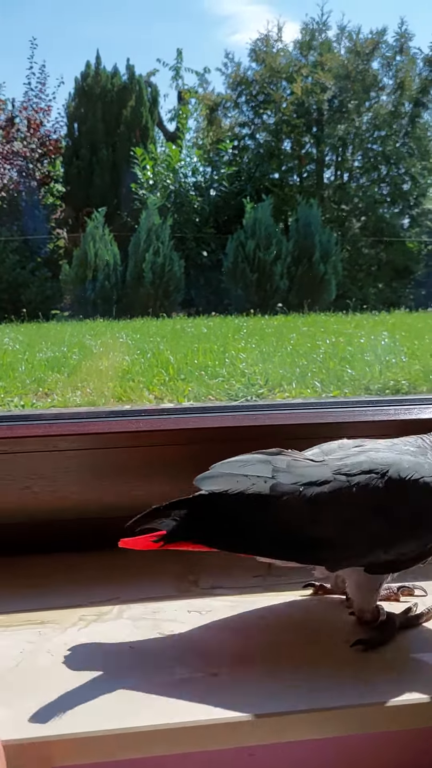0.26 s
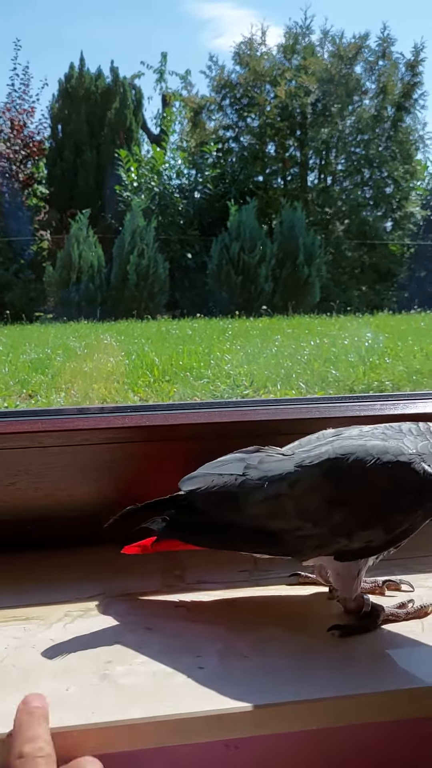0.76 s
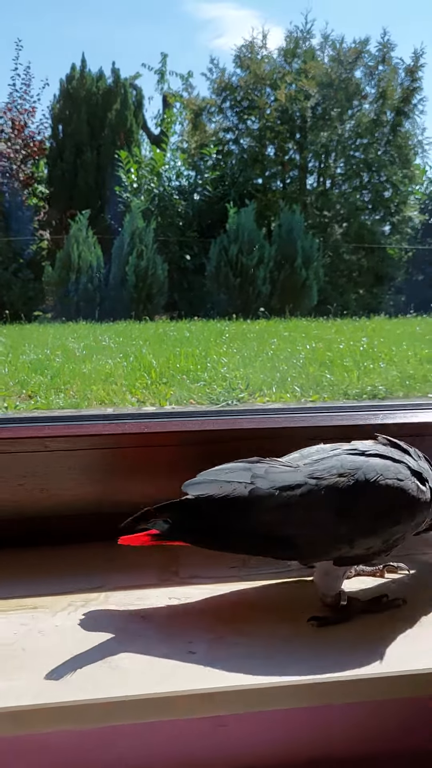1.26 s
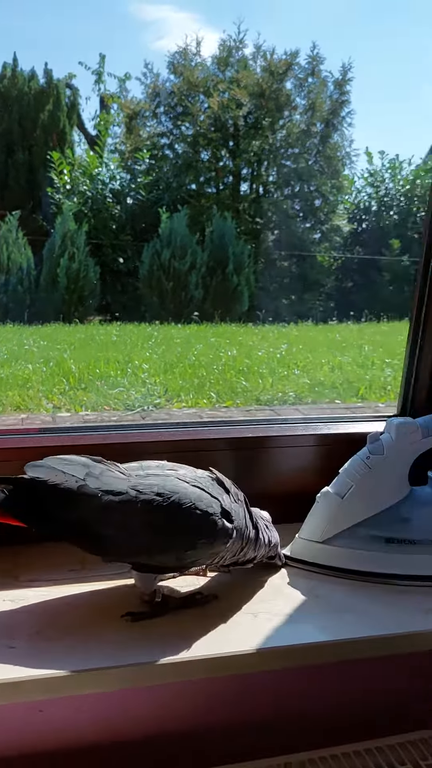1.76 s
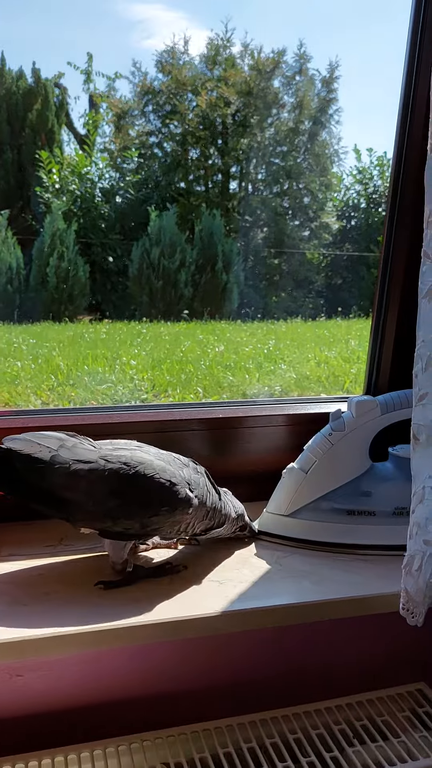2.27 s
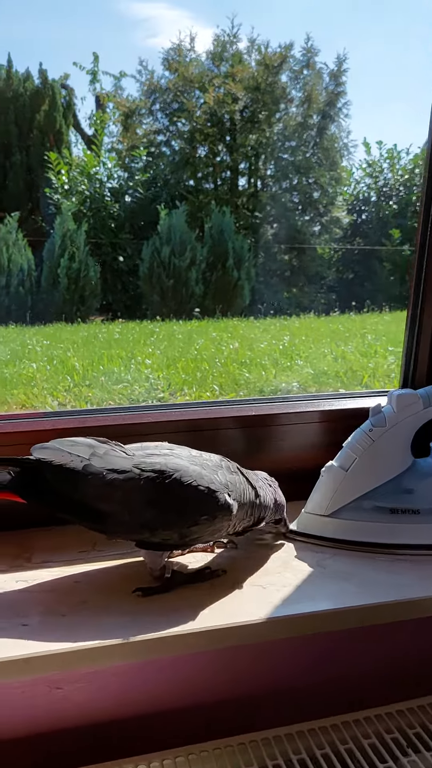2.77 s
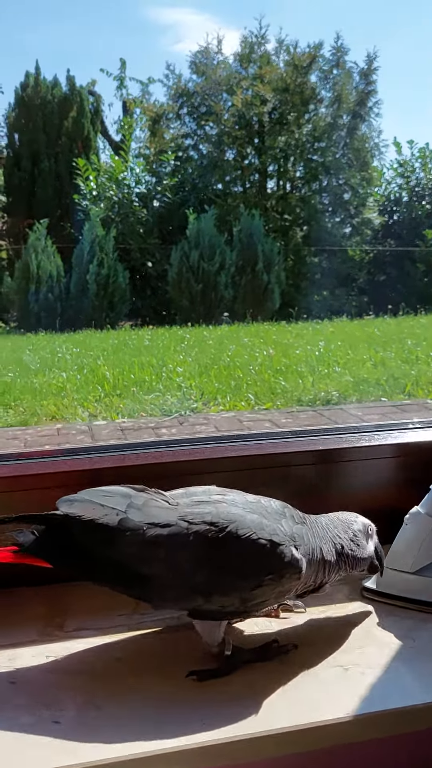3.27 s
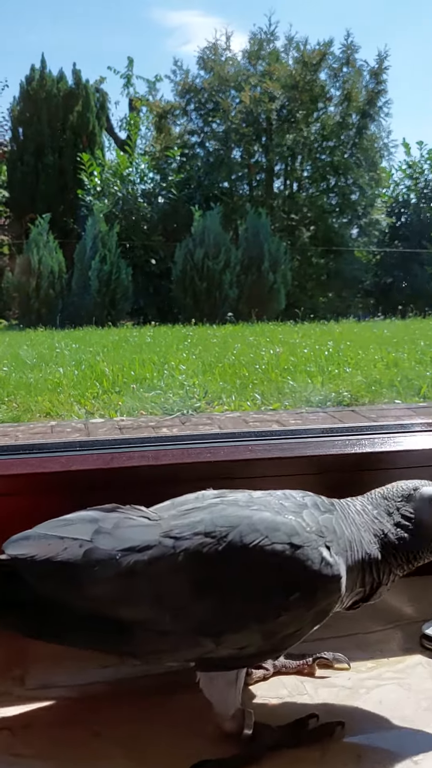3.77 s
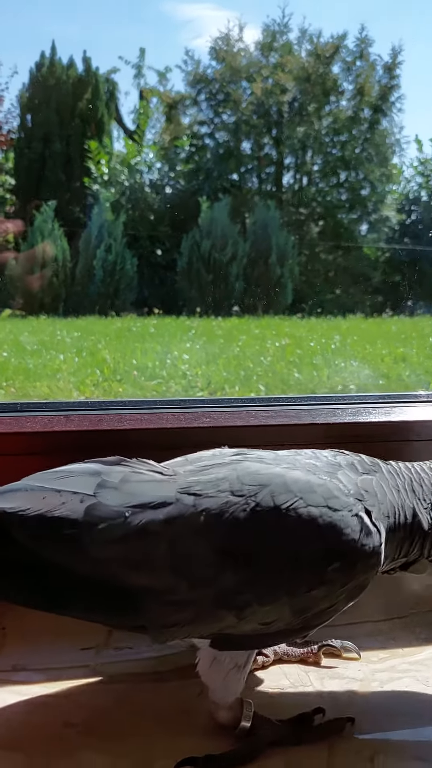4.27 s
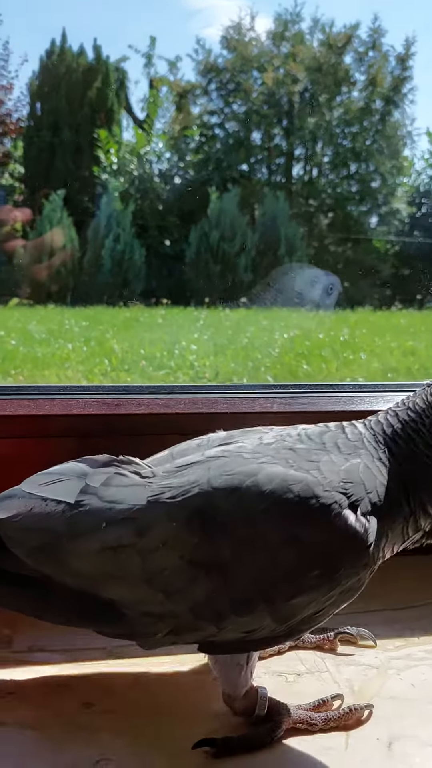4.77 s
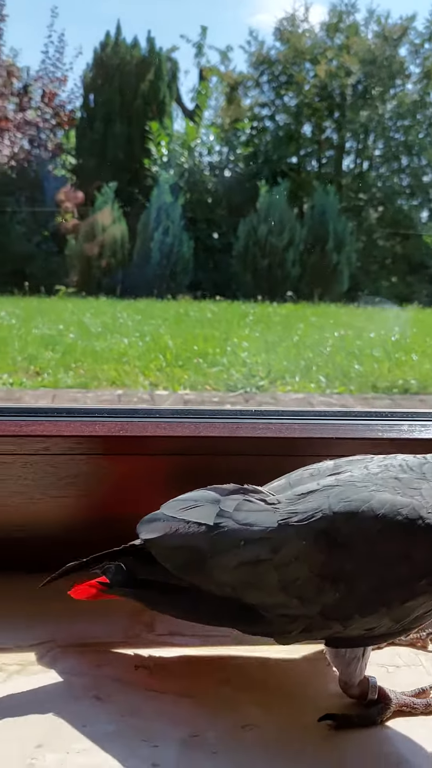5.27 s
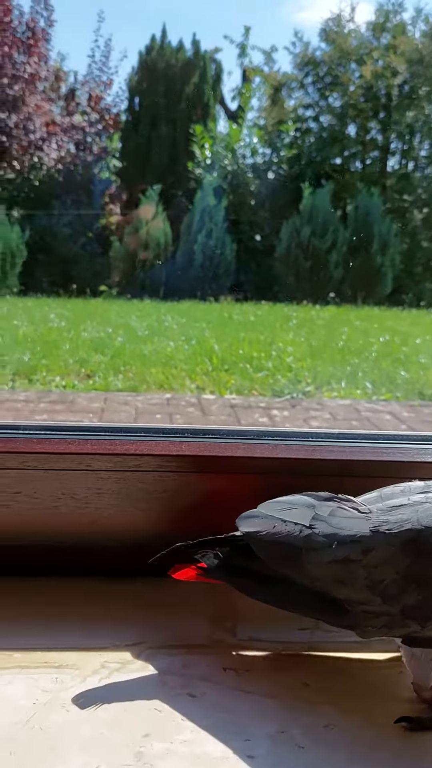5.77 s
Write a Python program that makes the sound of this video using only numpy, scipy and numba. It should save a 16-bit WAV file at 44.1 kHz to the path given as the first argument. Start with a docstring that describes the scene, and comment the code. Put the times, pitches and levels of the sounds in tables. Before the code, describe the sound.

A parrot moves about on a stone sill in a small, lightly echoing room. Four muted paired finger taps lead to a hard beak knock on an iron, with short metallic rattles and gritty drags after it. Feathers or cloth swish, claws tick and scratch increasingly densely, and a single heavy stone knock dominates late. Soft brushing ends it. The microphone is close, with low house rumble and quiet hiss.

```python
"""Parrot on a stone windowsill

Indoors, close to a hand-held phone, fingers and feet thump the sill and the beak knocks and drags a clothes iron.
Blows excite decaying modes; dragging and scrabbling are stick-slip noise through the same modes.
Claw ticks and feather and cloth rustles are shaped noise; a faint whistle and short high tones are sines.
A small room adds dense, decaying echoes over a low house rumble and a steady hiss.
"""
import sys
import numpy as np
from scipy import signal
from scipy.fft import rfft, irfft
from scipy.io import wavfile
from scipy.ndimage import uniform_filter1d
from numba import njit

SR = 44100
rng = np.random.default_rng(int(sys.argv[2]) if len(sys.argv) > 2 else 0)


def generate_wav(sig):
    """Save sig (samples, or channels by samples) to the path in sys.argv[1] as 16-bit PCM at SR."""
    pcm = np.round(np.clip(np.atleast_2d(sig).T, -1, 1) * 32767).astype(np.int16)
    wavfile.write(sys.argv[1], SR, pcm)


N = 265482  # samples

# modes of the stone slab, before each blow's weighting and damping: mode_hz, relative_db, t60_s
SILL_MODES = [(132, -19, .55), (200, -11, .15), (225, -5, .06), (235, -13, .4), (258, -14, .42),
              (301, -10, .38), (345, -9, .25), (407, -9, .27), (458, -8, .27), (528, -11, .2),
              (620, -14, .15), (720, -14, .17), (960, -13, .15), (1070, -10, .2)]
# modes of the clothes iron, before each blow's weighting and damping: mode_hz, relative_db, t60_s
IRON_MODES = [(408, -0.5, 0.087), (528.6, -3, 0.15), (569, -5, 0.13), (601, -32, 0.5), (906, -2, 0.067),
              (1133, 0, 0.045), (1410, -6.5, 0.086), (1954, 2, 0.1), (2140, 1, 0.05), (2280, -34, .03)]
# treble spectrum of the dragged iron and the rustles: frequency_hz, relative_db
TREBLE_SPECTRUM = [(3000, -28), (5000, -3.5), (7000, 1.5), (9000, -2.5), (11500, -0.5), (14000, -5),
                   (16000, -2.5)]

ALIKE_HZ = 670  # the two ports hear nearly the same below this
PORT_LAG_S = 0.00015  # later arrival at the right port
CRACK_PAN_DB = -4.5  # left minus right: the phone's body shades the left port from bright sounds
CRACK_RISE_S = 0.0015
SPOT_DB, SPOT_OCTAVES = 12.5, 0.21  # the struck spot lifts the modes near its favoured one


def undb(db):
    """Level law: decibels to an amplitude ratio."""
    return 10 ** (np.asarray(db) / 20)


def unit(x):
    """Power normalisation: scales to rms 1."""
    return x / np.sqrt(np.mean(x ** 2))


def fade(t, t60):
    """Exponential decay: 60 dB down after t60 seconds."""
    return np.exp(-np.log(1000) * t / t60)


def band(x, hz, width):
    """Resonance: a band-pass of the given centre and width in Hz."""
    centre = min(hz, .45 * SR)
    sharpness = hz / min(width, .4 * SR)
    return signal.lfilter(*signal.iirpeak(centre, sharpness, fs=SR), x)


@njit
def sweep(x, hz, width):
    """Moving resonance: a state-variable band-pass whose centre follows hz."""
    y, b, l = np.empty(len(x)), 0., 0.
    for i in range(len(x)):
        g, k = np.tan(np.pi * hz[i] / SR), width / hz[i]
        v = (b + g * (x[i] - l)) / (1 + g * (g + k))
        b, l, y[i] = 2 * v - b, l + 2 * g * v, k * v
    return y


def colour(x, points):
    """Spectral weighting: filters x by (Hz, dB) points joined along log frequency."""
    hz, db = np.transpose(points)
    f = np.maximum(np.arange(x.shape[-1] // 2 + 1) * SR / x.shape[-1], 1)
    gain = undb(np.interp(np.log(f), np.log(hz), db))
    return irfft(rfft(x) * gain, x.shape[-1])


def ports(count):
    """Spatial coherence: noise at two ports, shared in the bass and unrelated in the treble."""
    mid, side = rng.standard_normal((2, count))
    side = signal.lfilter(*signal.butter(1, ALIKE_HZ, "high", fs=SR), side)
    return np.array([mid + side, mid - side]) / np.sqrt(2)


def walk(rate):
    """Slow fluctuation: random levels held 1 / rate s and slewed, spread near 1."""
    k = int(SR / rate)
    return uniform_filter1d(np.repeat(rng.standard_normal(N // k + 1), k), k)[:N]


def glide(s, hz):
    """Linear interpolation: joins values in time."""
    return np.interp(np.arange(N) / SR, s, hz)


def pan(db):
    """Level difference: left and right gains whose ratio is db."""
    return undb(np.array([db, -db]) / 2)


def add(out, s, sound, pan_db, lag_s):
    """Superposition: mixes in a sound at time s, with level and arrival differences between ports."""
    for port, gain in enumerate(pan(pan_db)):
        i = int((s + port * lag_s) * SR)
        out[port, i:i + len(sound)] += gain * sound[:N - i]


def strokes(start, hold, db, rise_s, t60):
    """Envelope: gain over time, one row a stroke, with rise, hold and exponential fall."""
    out = np.zeros((len(start), N))
    rises = np.resize(rise_s, len(start))
    for row, s, hold_s, gain, rise in zip(out, start, hold, undb(db), rises):
        first = max(int(s * SR), 0)
        last = min(int((s + rise + hold_s + t60) * SR), N)
        i = np.arange(first, last)
        t = i / SR - s
        fall = fade(np.maximum(t - rise - hold_s, 0), t60)
        row[i] = gain * np.clip(t / rise, 0, 1) ** 2 * fall
    return out


def ring(modes, contact_ms, scatter_db, blur, rise_s, spot_hz):
    """Modal response: a half-sine push sets modes ringing, weighted by the struck spot; peak 1."""
    hz, db, t60 = np.transpose(modes)[:, :, None]
    t = np.arange(int(t60.max() * SR)) / SR
    lift_db = SPOT_DB * np.exp(-(np.log2(hz / spot_hz) / SPOT_OCTAVES) ** 2)
    spot = undb(db + lift_db + scatter_db * rng.standard_normal(hz.shape))
    # every mode is a close cluster, wider towards the top, so no clean whistle is left
    cluster = 0
    for _ in range(3):
        detune = 1 + blur * hz / 1000 * rng.standard_normal(hz.shape)
        cluster = cluster + np.sin(2 * np.pi * hz * detune * t)
    swing = (1 - np.exp(-t / rise_s)) * np.sum(spot * fade(t, t60) * cluster, 0)
    n = max(int(contact_ms * SR / 1000), 2)
    push = np.sin(np.pi * (np.arange(n) + .5) / n)
    y = np.convolve(swing, push)[:len(t)]
    return y / np.abs(y).max()


def crack(hz, width, t60):
    """Contact noise: a band of noise, rms 1 before its short rise and exponential fall."""
    t, noise = np.arange(SR // 4) / SR, rng.standard_normal(SR // 4)
    narrow = band(noise, hz, width)
    steep = band(band(narrow, hz, 2 * width), hz, 2 * width)
    return unit(steep) * fade(t, t60) * np.minimum(t / CRACK_RISE_S, 1)


def strikes(events, modes, scatter_db, blur, rise_s, crack_hz, crack_t60, lag_s):
    """Impact and damping: blows ring a body and crack; what stays on the body shortens its decay."""
    out = np.zeros((2, N))
    for s, body_db, crack_db, contact_ms, spot_hz, free, pan_db in events:
        damped = np.array(modes) * [1, 1, free]
        body = ring(damped, contact_ms, scatter_db, blur, rise_s, spot_hz)
        contact = crack(crack_hz, 2730, free * crack_t60)
        add(out, s - rise_s, undb(body_db) * body, pan_db, lag_s)
        add(out, s - rise_s, undb(crack_db) * contact, pan_db + CRACK_PAN_DB, lag_s)
    return out


def grit(rate, spread_db):
    """Stick-slip: dense random slips of very uneven size modulate noise at both ports."""
    size = undb(spread_db * np.minimum(rng.exponential(size=N), 4))
    slips = (rng.random(N) < rate / SR) * size
    puffs = signal.lfilter([1], [1, -fade(1 / SR, 0.045)], slips)  # each slip falls 60 dB in 45 ms
    return unit(ports(N) * puffs)


def friction(table, rise_s, fall_t60, modes, top, rate, blur):
    """Friction-driven resonance: stick-slip shakes a body while grit scratches above it."""
    s, hold, *levels_db, pan_db = np.transpose(table)
    body, gritty, treble = (pan(pan_db) @ strokes(s, hold, db, rise_s, t60)
                            for db, t60 in zip(levels_db, fall_t60))
    slips = grit(rate, 2.1)
    # rubbing widens each mode by the share blur of its frequency
    rings = [(hz, undb(db) * unit(band(slips, hz, 0.67 / t60 + blur * hz))) for hz, db, t60 in modes]
    low = unit(sum(y for hz, y in rings if 200 < hz < 800))
    high = sum(y for hz, y in rings if hz > 800)
    hash_noise = unit(band(band(slips, 2200, 2600), 2200, 5000))
    scratch = unit(3.0 * high + hash_noise)
    return body * low + gritty * scratch + treble * unit(colour(slips, top))


def thumps():
    """Impact on a slab: blows excite the stone's modes, some cut short by damping."""
    # thumps: time_s, thump_db, crack_db, contact_ms, favoured_mode_hz, free_ring_share, left_minus_right_db
    thump_rows = [(0.052, -36.5, -47, 0.58, 296, 0.22, -1.5), (0.089, -40.5, -57, 0.66, 142, 0.29, -5),
                  (1.911, -49.5, -74, 0.27, 232, 1, 3), (3.243, -36.5, -45.5, 0.73, 325, 0.4, -2.5),
                  (4.072, -47.5, -45, 0.69, 253, 0.27, 3.5), (4.202, -57.5, -80, 0.56, 590, 0.39, 9),
                  (4.362, -49.5, -52, 0.41, 344, 0.33, 9.5), (4.461, -47, -69, 0.5, 335, 0.29, 7),
                  (4.534, -46.5, -82, 0.63, 345, 0.3, 6.5), (4.895, -15.5, -33.5, 0.54, 242, 0.89, -3)]
    return strikes(thump_rows, SILL_MODES, 1.0, 0.017, 0.003, 1190, 0.21, .00003)


def fingers():
    """Paired impacts: two fingertips land one after the other on the sill's edge."""
    # taps of the first finger: time_s, thump_db, crack_db, left_minus_right_db
    tap_rows = [(0.272, -40, -87, 3), (0.46, -43, -74.5, -5), (0.632, -43, -81, 3.5),
                (0.82, -44, -83.5, -2.5)]
    # modes of the sill's edge, before each tap's weighting: mode_hz, relative_db, t60_s
    edge_modes = [(165, -15, .1), (233, -1, 0.083), (311.6, 2.5, 0.085), (337.5, -2.5, 0.089),
                  (450, -4.5, 0.089), (529, 0.5, 0.074), (623, -12, 0.072), (724, -9.5, 0.044),
                  (883, -13, 0.072)]
    contact_ms, spot_hz = 1, 669
    second_s, second_db = 0.028, -5.5  # delay and relative level of the second finger
    rows = []
    for s, db, crack_db, pan_db in tap_rows:
        for late_s, less_db in ((0, 0), (second_s, second_db)):
            rows.append((s + late_s, db + less_db, crack_db + less_db, contact_ms, spot_hz, 1, pan_db))
    return strikes(rows, edge_modes, 1.0, 0.045, 0.0059, 2000, 0.3, .00005)


def beak_blows():
    """Impact on metal: the beak excites the iron's modes."""
    # blows: time_s, body_db, crack_db, contact_ms, favoured_mode_hz, free_ring_share, left_minus_right_db
    blow_rows = [(1.146, -47.5, -52, 0.15, 546, 1, 0), (1.169, -25.5, -37.5, 0.83, 520, 0.69, -4.5),
                 (1.219, -44, -72, 0.68, 525, 0.32, -3), (1.294, -44, -58, 0.37, 570, 0.55, 3),
                 (1.389, -38, -76, 0.47, 565, 0.5, 2), (1.488, -48.5, -69, 0.53, 565, 1, 3),
                 (1.638, -62, -61, 0.55, 630, 0.88, 11), (2.025, -60, -62, 0.35, 387, 0.72, -6),
                 (2.115, -44.5, -46, 0.12, 510, 1, 5), (2.195, -48.5, -60, 0.85, 430, 0.76, 2),
                 (2.51, -48, -67, 0.25, 530, 1, 2), (2.601, -55, -43, 0.32, 560, 1, 7),
                 (2.74, -56, -74, 0.18, 564, 0.51, 4), (2.762, -52, -70, 0.24, 570, 0.6, 3),
                 (2.79, -57, -63, 0.2, 617, 0.9, 10), (2.949, -45.5, -55, 0.21, 554, 0.74, 0)]
    return strikes(blow_rows, IRON_MODES, 3, 0.022, 0.0025, 2200, 0.038, PORT_LAG_S)


def iron_drags():
    """Stick-slip: the iron, dragged over stone, rings in its own widened modes."""
    # strokes: start_s, hold_s, body_db, grit_db, treble_db, left_minus_right_db
    drag_rows = [(1.178, 0.0078, -42, -61, -82, -0.5), (1.245, 0.013, -58, -43, -76, 1),
                 (1.295, 0.0039, -54, -67, -86, -2), (1.372, 0.029, -56, -58, -102, -1),
                 (1.48, 0.017, -62.5, -73, -75, -2), (1.525, 0.03, -63, -65, -76, 0),
                 (2.118, 0.0043, -50.5, -57.5, -69, -4.5), (2.19, 0.035, -59, -76, -77, -2),
                 (2.236, 0.033, -54.5, -74, -81, -1), (2.28, 0.041, -53.5, -68, -75, -1),
                 (2.345, 0.025, -67.5, -64.5, -82, -3), (2.495, 0.029, -57, -60.5, -75, -1),
                 (2.592, 0.028, -57, -55, -72, 0.5), (2.772, 0.069, -63, -63.5, -75, -2),
                 (2.945, 0.011, -52.5, -89, -80, 2), (3.03, 0.035, -70.5, -67.5, -79, -7)]
    rise_s, t60_s = 0.011, (0.19, 0.13, 0.35)  # falls of body, grit, treble
    return friction(drag_rows, rise_s, t60_s, IRON_MODES, TREBLE_SPECTRUM, 1800, .07)


def claws():
    """Brief contact: claw tips tick on stone as noise bursts; one snap rings a small hard part."""
    # ticks: start_s, level_db, treble_db, centre_hz, t60_s, left_minus_right_db
    tick_rows = [(1.2597, -40, -73, 1970, 0.13, -7), (1.294, -34, -82, 1770, 0.038, -8.5),
                 (1.5282, -58.5, -71, 1870, 0.16, -6), (1.8462, -74, -69, 3960, 0.11, -13),
                 (1.9076, -59, -79, 1620, 0.03, -10), (2.3067, -54.5, -80, 1850, 0.08, -11.5),
                 (2.516, -55, -88, 1780, 0.17, -4), (2.5999, -60.5, -67.5, 2470, 0.15, -27.5),
                 (3.254, -45.5, -77, 2340, 0.02, -26.5), (3.3423, -47.5, -67, 1960, 0.17, -10.5),
                 (3.843, -59, -67, 2300, 0.04, -7), (3.875, -62, -72, 1870, 0.016, -8),
                 (4.02, -60, -68, 2100, 0.035, -1), (4.0478, -46, -53, 1610, 0.035, -7),
                 (4.069, -65, -51, 2550, 0.042, -3), (4.114, -47, -78, 1340, 0.019, -20),
                 (4.2048, -65, -71, 2160, 0.03, -15), (4.272, -45, -55, 2070, 0.0092, -3),
                 (4.334, -58, -50, 2120, 0.027, 0), (4.5189, -45, -60, 2290, 0.023, 2),
                 (4.5306, -48, -68, 2220, 0.025, -15.5), (4.7395, -59.5, -50.5, 1600, 0.087, -11),
                 (4.779, -50, -75.5, 2010, 0.084, -6), (4.815, -44, -57, 2090, 0.013, -7),
                 (5.2077, -64, -72, 1730, 0.023, -27)]
    # one bright snap: start_s, level_db, left_minus_right_db
    snap_rows = [(4.4129, -25.5, -8.5)]
    # modes of the small hard part, before the snap's weighting: mode_hz, relative_db, t60_s
    snap_modes = [(2200, -4, .008), (4170, -8, .012), (6460, -3, .02), (7690, -7, .018), (10400, -5, .012),
                  (12600, 0, .018), (13500, -6, .01)]
    out = np.zeros((2, N))
    for s, db, treble_db, hz, t60, pan_db in tick_rows:
        tick = undb(db) * crack(hz, 1500, t60) + undb(treble_db) * crack(7700, 9900, t60)
        add(out, s, tick, pan_db, PORT_LAG_S)
    for s, db, pan_db in snap_rows:
        add(out, s, undb(db) * ring(snap_modes, .05, 0, 0.0019, 0.00023, 9900), pan_db, PORT_LAG_S)
        add(out, s, undb(db - 8.0) * crack(9160, 9500, 0.039), pan_db, PORT_LAG_S)
    return out


def scrabble():
    """Stick-slip: claws scrabbling over the slab shake its widened modes."""
    # strokes: start_s, hold_s, body_db, grit_db, treble_db, left_minus_right_db
    scrabble_rows = [(4.325, 0.031, -55.5, -52.5, -57, -1), (4.398, 0.0046, -47, -62, -61, 3),
                     (4.42, 0.038, -55.5, -66.5, -54, -3), (4.48, 0.17, -76.5, -75, -63, -2),
                     (4.525, 0.0039, -54.5, -73, -74.5, 3), (4.66, 0.04, -74, -72.5, -59, -2),
                     (4.712, 0.012, -58, -69, -57.5, 1.5), (4.73, 0.022, -63, -66, -57.5, 5),
                     (4.79, 0.18, -69, -66.5, -63, 1.5)]
    # treble spectrum of the claws: frequency_hz, relative_db
    claw_spectrum = [(3000, -24), (5000, -4), (7000, -2.5), (9000, -4.5), (11500, 2), (13500, -3),
                     (16000, -8.5)]
    rise_s, t60_s = 0.012, (0.11, 0.14, 0.067)  # falls of body, grit, treble
    return friction(scrabble_rows, rise_s, t60_s, SILL_MODES, claw_spectrum, 900, .16)


def creak():
    """Stick-slip: fast slips sound through one gliding and one fixed resonance."""
    # short creaks: start_s, hold_s, level_db, resonance_hz
    creak_rows = [(1.908, 0.024, -55.5, 1390), (2.021, 0.003, -59, 1110)]
    rise_s, t60_s = (0.029, 0.0065), 0.079  # one rise per creak
    s, hold, db, hz = np.transpose(creak_rows)
    slips, hz = grit(1900, 1.6), glide(s + 0.021, hz)
    tone = []
    for x in slips:
        moving = sweep(sweep(x, hz, 280.0), hz, 280.0)
        still = band(band(x, 840, 290), 650, 350)
        tone.append(moving + 1.1 * still)
    return strokes(s, hold, db, rise_s, t60_s).sum(0) * unit(np.array(tone))


def rustles():
    """Comb filtering: soft friction of feathers and cloth meets its mirror image in the sill."""
    # swells: start_s, hold_s, level_db, treble_db, resonance_hz, left_minus_right_db
    rustle_rows = [(-0.04, 0.0053, -60, -63, 1740, -4), (0.026, 0.018, -55, -63, 1840, -4.5),
                   (0.205, 0.051, -76, -76.5, 1900, -9), (1.813, 0.011, -70.5, -69, 1930, -3),
                   (1.89, 0.038, -74.5, -77, 1440, -16), (2.926, 0.0094, -65, -76, 1800, -13),
                   (3.04, 0.14, -63, -67, 2100, -6.5), (3.205, 0.066, -56.5, -61, 2050, -3.5),
                   (3.304, 0.024, -55, -55, 1950, -1), (3.442, 0.15, -63, -65, 1930, -3.5),
                   (3.61, 0.074, -74.5, -71.5, 2270, -6), (3.72, 0.16, -79, -75.5, 2500, -8),
                   (4.017, 0.0071, -59, -63.5, 1740, 6), (4.238, 0.014, -68, -74, 1650, -4),
                   (4.937, 0.046, -60, -68.5, 2000, -8), (5.08, 0.11, -66.5, -67.5, 1960, -1.5),
                   (5.204, 0.026, -67, -65.5, 2080, -5), (5.303, 0.15, -63, -66.5, 1880, -4.5),
                   (5.513, 0.06, -55, -54.5, 1850, -2.5), (5.662, 0.037, -59.5, -64.5, 1620, -4.5),
                   (5.854, 0.044, -72, -72.5, 1690, -5)]
    rise_s, t60_s = 0.039, (0.22, 0.2)  # falls of middle and treble
    s, hold, db, treble_db, hz, pan_db = np.transpose(rustle_rows)
    hz = glide(s + rise_s, hz)
    rub = grit(4000, 2.0)
    core = np.array([sweep(sweep(x, hz, 1800.0), hz, 1800.0) for x in rub])
    upper = band(band(rub, 3470, 3300), 3470, 3300)
    middle = unit(unit(core) + .5 * unit(upper))
    level, treble = (pan(pan_db) @ strokes(s, hold, d, rise_s, t60)
                     for d, t60 in zip((db, treble_db), t60_s))
    mix = level * middle + treble * unit(colour(rub, TREBLE_SPECTRUM))
    # the echo lags by one period of the first comb peak, gliding as the phone moves
    late = np.arange(N) - SR / uniform_filter1d(hz, int(.1 * SR))
    echo = np.array([np.interp(late, np.arange(N), x) for x in mix])
    return undb(walk(25)) * (mix + .09 * echo)  # flicker near 1 dB


def whistle():
    """Harmonic series: a thin, wavering, rising whistle of three high partials within the rustle."""
    # partials of the whistle: multiple, relative_db
    partials = [(3, 0), (4, -3), (5, 1)]
    start_s, length_s, level_db = 2.99, 0.21, -79
    from_hz, to_hz = 2040, 2290  # gliding base; the partials are its multiples
    out = np.zeros((2, N))
    along = np.arange(int(length_s * SR)) / SR / length_s
    hz = from_hz + (to_hz - from_hz) * np.sin(np.pi * along / 2) ** 2
    wavering_hz = hz * (1 + .003 * walk(70)[:len(hz)])
    phase = 2 * np.pi * np.cumsum(wavering_hz) / SR
    tone = sum(undb(d) * np.sin(k * phase) for k, d in partials)
    level = undb(level_db + 1.5 * walk(30)[:len(hz)]) * np.sin(np.pi * along)
    add(out, start_s, level * tone, 0, 0)
    return out


def high_tones():
    """Pure tones: very short, faint, steady high sines under half-sine envelopes."""
    # tones: start_s, pitch_hz, level_db, length_s
    tone_rows = [(3.576, 11600, -63, 0.027), (5.71, 5800, -55, 0.0079), (5.916, 6030, -68, 0.018)]
    out = np.zeros((2, N))
    for s, hz, db, length_s in tone_rows:
        t = np.arange(int(length_s * SR)) / SR
        tone = np.sin(np.pi * t / length_s) * np.sin(2 * np.pi * hz * t)
        add(out, s, undb(db) * tone, -2, PORT_LAG_S)
    return out


def room(x):
    """Reverberation: dense echoes, each octave dying at its own pace."""
    # decay of the room: frequency_hz, t60_s
    room_decay = [(100, 0.5), (500, 0.29), (2000, 0.51), (7000, 0.21), (12000, 0.75)]
    room_db, gap_s = -4.5, 0.0035  # the tail is silent for one gap, then rises over another
    t = np.arange(int(.6 * SR)) / SR
    hz, t60 = np.transpose(room_decay)
    noise = ports(len(t))
    tail = 0
    for f in 110 * 2. ** np.arange(8):
        octave_t60 = np.interp(np.log(f), np.log(hz), t60)
        tail = tail + band(noise, f, 1.15 * f) * fade(t, octave_t60)
    tail = tail * np.clip(t / gap_s - 1, 0, 1)
    tail = tail / np.sqrt(np.sum(tail ** 2) / 2)  # unit energy per port on average
    return undb(room_db) * signal.fftconvolve(x.mean(0, keepdims=True), tail, axes=1)[:, :N]


def background():
    """Filtered noise: wavering low rumble, its shudders and the steady hiss of room and microphone."""
    # rumble spectrum: frequency_hz, relative_db
    rumble_spectrum = [(12, -79), (20, -42.5), (42, -5.5), (109, 0.5), (140, -2.5), (184, -12.5),
                       (258, -11.5), (400, -25.5), (520, -63), (880, -120)]
    # hiss spectrum: frequency_hz, relative_db
    hiss_spectrum = [(120, -46), (200, -28), (294, -11), (548, -19.5), (623, -19), (933, -22.5),
                     (1080, -24.5), (5230, -35), (8120, -30.5), (16000, -39)]
    # low shudders of wall and hand-held phone: start_s, hold_s, level_db
    shudder_rows = [(0.013, 0.079, -50.5), (0.259, 0.01, -57.5), (0.454, 0.007, -66), (0.614, 0.023, -65),
                    (1.148, 0.0083, -58), (1.81, 0.022, -56.5), (1.954, 0.057, -61), (2.323, 0.017, -67),
                    (2.494, 0.025, -69), (3.049, 0.03, -61.5), (3.229, 0.03, -54), (3.51, 0.072, -64.5),
                    (3.712, 0.16, -71.5), (4.929, 0.005, -44.5), (4.998, 0.01, -34.5), (5.247, 0.005, -70)]
    rumble_db, sway_db, flicker_db, hiss_db = -68, 1, 1.1, -76.5
    unrelated = .28 * rng.standard_normal((2, N))  # keeps the two ports from matching in the bass
    rumble = unit(colour(ports(N) + unrelated, rumble_spectrum))
    shudder = strokes(*np.transpose(shudder_rows), 0.025, 0.25).sum(0)  # rise, t60 in s
    swell = undb(rumble_db + sway_db * walk(2.5) + flicker_db * walk(30)) + shudder
    return swell * rumble + undb(hiss_db) * unit(colour(ports(N), hiss_spectrum))


def scene():
    """Superposition: direct sounds, their reverberation and the background add."""
    sill = thumps() + fingers()
    iron = beak_blows() + iron_drags()
    small = claws() + scrabble() + creak() + rustles() + whistle() + high_tones()
    return sill + iron + small + room(1.26 * sill + iron + small) + background()


def record(dry):
    """Band limiting: the phone cuts the top above 15.8 kHz."""
    return signal.sosfilt(signal.ellip(10, .2, 80, 15800, fs=SR, output="sos"), dry)


dry = scene()
out = record(dry)
generate_wav(out)
```